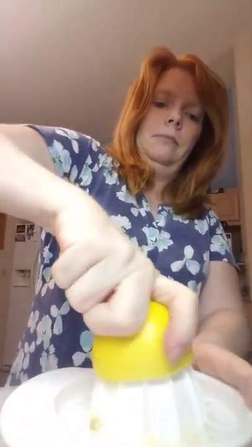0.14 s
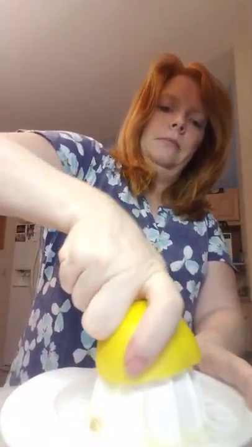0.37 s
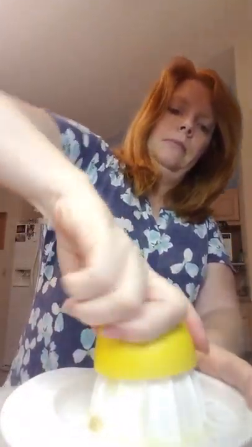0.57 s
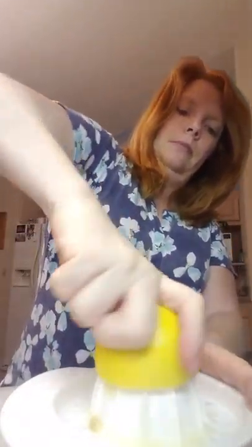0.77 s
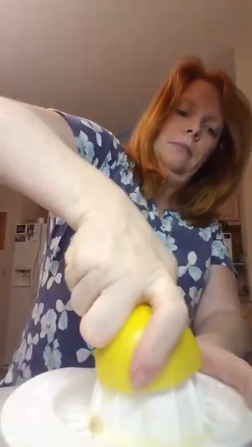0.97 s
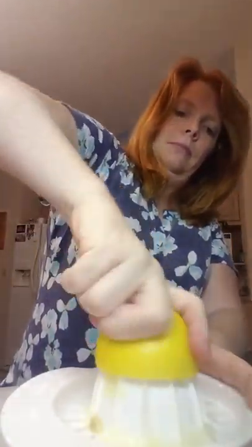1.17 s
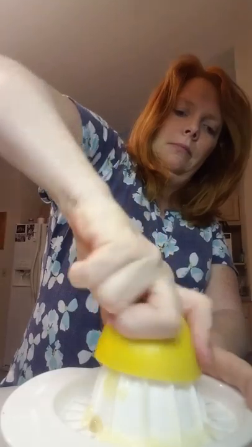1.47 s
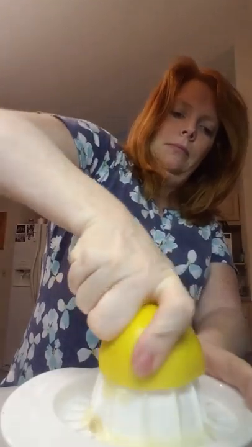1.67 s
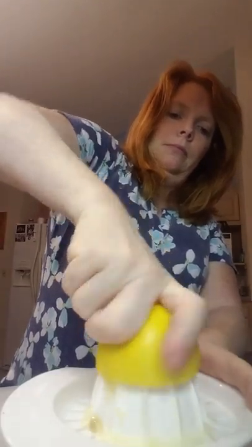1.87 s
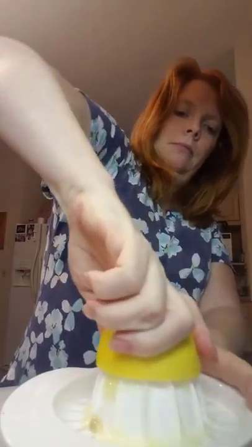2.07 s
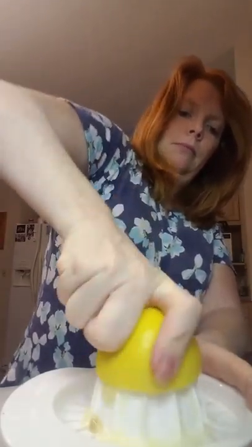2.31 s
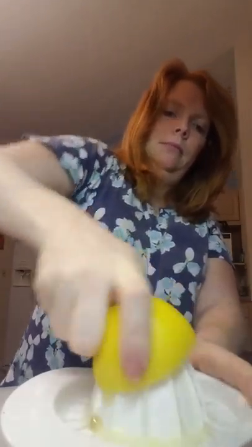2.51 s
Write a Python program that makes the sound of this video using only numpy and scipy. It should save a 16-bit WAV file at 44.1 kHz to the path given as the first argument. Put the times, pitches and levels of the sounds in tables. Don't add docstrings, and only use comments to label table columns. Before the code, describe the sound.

Close phone pickup of hand juicing a lemon: rind jolts over plastic ridges, the bowl thumps the worktop, pulp squishes and pops in uneven bursts, over faint low hum in a small hard room, slightly stronger at right.

```python
import sys
import numpy as np
from scipy import signal
from scipy.fft import rfft, irfft
from scipy.io import wavfile
from scipy.ndimage import uniform_filter1d

SR = 44100
rng = np.random.default_rng(int(sys.argv[2]) if len(sys.argv) > 2 else 0)


def voltage_ratio(level):
    return 10 ** (np.asarray(level, float) / 20)


def materialize(psi):
    bounded = np.clip(np.atleast_2d(psi).T, -1, 1)
    quanta = np.round(bounded * 32767).astype(np.int16)
    wavfile.write(sys.argv[1], SR, quanta)


N = 116865
SPAN = 8192


def unit(x):
    return x / np.sqrt(np.mean(x ** 2))


def gain_at(table, hz):
    points = np.array(table, float)
    return voltage_ratio(np.interp(np.log(hz + 1), np.log(points[:, 0] + 1), points[:, 1]))


def colour(x, table, lag_s=0.):
    hz = np.fft.rfftfreq(N, 1 / SR)
    delay = np.exp(-2j * np.pi * hz * lag_s)
    return irfft(rfft(x) * gain_at(table, hz) * delay, N)


def walk(rate):
    hold = int(SR / rate)
    steps = np.repeat(rng.standard_normal(N // 20), hold)[:N]
    return 2.25 * uniform_filter1d(steps, hold)


def grit(per_s, scatter_db):
    chance, sign, size = rng.random((3, N))
    ticks = (chance < per_s / SR) * np.sign(sign - .5)
    return unit(ticks * voltage_ratio(-scatter_db * np.log(size + 1 / 50)))


def bursts(times, dbs, lengths, rises):
    env, t = np.zeros(N + SPAN), np.arange(SPAN) / SR
    for start, db, length, rise in np.broadcast(times, dbs, lengths, rises):
        i = int(start * SR)
        attack = (1 - np.exp(-t / rise)) ** 2
        env[i:i + SPAN] += voltage_ratio(db) * attack * np.exp(-t / max(length, 2e-4))
    return env[:N]


def tinted(rows, lengths, rises, peak_db, octaves, force, thin_db=0.):
    skirt_db_per_oct, lead = 2, 64
    out, hz = np.zeros((2, N + SPAN)), np.fft.rfftfreq(SPAN, 1 / SR)
    force = np.pad(force, ((0, 0), (0, SPAN)))
    for start, db, centre_hz, length, rise in np.broadcast(*np.array(rows).T[:3], lengths, rises):
        i = int(start * SR) - lead
        env = np.roll(bursts(0, db, length, rise)[:SPAN], lead)
        away = np.abs(np.log2((hz + 1) / centre_hz))
        peak = peak_db * (np.exp(-.5 * (away / octaves) ** 2) - 1)
        skirt = (skirt_db_per_oct + thin_db * (hz < centre_hz)) * away
        out[:, i:i + SPAN] += irfft(rfft(env * force[:, i:i + SPAN]) * voltage_ratio(peak - skirt), SPAN)
    return out[:, :N]


def swings(rows, cycles, glide):
    out, t = np.zeros(N + SPAN), np.arange(SPAN) / SR
    for start, db, hz, turns in np.broadcast(*np.array(rows).T[:3], cycles):
        u, i = t * hz / turns, int(start * SR)
        swell = 4 * u * np.exp(1 - 4 * u)
        phase = 2 * np.pi * turns * u * (1 + glide * np.minimum(u, 2))
        out[i:i + SPAN] += voltage_ratio(db) * swell * np.sin(phase)
    return out[:N]


def ring(x, modes):
    t, h = np.arange(SPAN) / SR, 0
    for hz, db, t60 in modes:
        decay = np.exp(-np.log(1000) * t / t60)
        h = h + voltage_ratio(db) * np.sin(2 * np.pi * hz * t) * decay / np.sqrt(t60)
    return signal.fftconvolve(x, h[None] / np.sqrt(np.sum(h ** 2)), axes=1)[:, :N]


# frequency in Hz, level in dB.
OWN_SHARE = [(60, -23.5), (300, 3), (750, -21), (1200, 4), (3000, -5.5), (6000, -4.5), (10000, 1),
             (15000, -1.5)]


def wide(force):
    return force() + np.array([colour(force(), OWN_SHARE) for _ in range(2)])


# time in seconds, rubbing level in dB, wetness level in dB.
HAND_PRESSURE = [(0, -53.5, -80), (.1, -42, -57.5), (0.329, -40, -41), (0.451, -58, -65),
                 (0.587, -28, -33.5), (0.727, -52.5, -60.5), (0.856, -31.5, -65), (.98, -75, -41),
                 (1.12, -52, -64.5), (1.252, -35.5, -34), (1.45, -58.5, -61.5), (1.54, -40, -48.5),
                 (1.74, -47, -58), (1.888, -75, -61.5), (1.976, -42.5, -40.5), (2.18, -52, -61),
                 (2.289, -54.5, -53.5), (2.46, -53, -55)]


def press(column):
    points = np.array(HAND_PRESSURE)
    return voltage_ratio(np.interp(np.arange(N) / SR, points[:, 0], points[:, column]))


# frequency in Hz, spectral level in dB per Hz.
HUSH = [(18, -46), (30, -31), (131, 14), (616, -7.5), (740, -21.5), (1100, -16), (2980, -23), (14000, -29),
        (16000, -49)]


def kitchen():
    mid, side = (voltage_ratio(-46) * unit(colour(rng.standard_normal(N), HUSH)) for _ in range(2))
    return mid + 0.077 * side * np.array([[1], [-1]])


def bubbles():
    out = 0
    for hz in np.geomspace(1500, 14000, num=9):
        b, a = signal.iirpeak(hz, 4.5, SR)
        out = out + unit(signal.lfilter(b, a, grit(per_s=70, scatter_db=3.6))) * np.sqrt(hz)
    return unit(out)


def crackle():
    films = grit(per_s=4900, scatter_db=3)
    return unit(films + voltage_ratio(0.5) * bubbles() + 0.59 * rng.standard_normal(N))


def wet_rub(wet, flutter):
    return wet * press(2) * voltage_ratio(-0.5 * (flutter + walk(60)))


# start in seconds, peak in dB, colour in Hz, length in seconds.
SQUELCHES = [(.008, -47.5, 2000, 0.019), (0.031, -39.5, 2110, 0.047), (0.069, -47, 3950, 0.018),
             (0.084, -36.5, 2320, 0.02), (0.119, -36, 2770, 0.028), (0.174, -35, 2200, 0.028),
             (0.574, -26, 6260, 0.0083), (0.5944, -16.5, 2980, 0.0074), (0.643, -22, 7700, 0.011),
             (0.756, -31, 7400, 0.048), (0.831, -17.5, 4570, 0.023), (0.989, -28, 2450, 0.014),
             (1.157, -37, 2960, 0.034), (1.214, -23, 2480, 0.02), (1.335, -27.5, 2050, 0.02),
             (1.488, -32.5, 2080, 0.038), (1.539, -39, 3470, 0.11), (1.5674, -14.5, 2640, 0.012),
             (1.576, -15.5, 2800, 0.012), (1.691, -29.5, 3080, 0.047), (1.923, -36.5, 2840, 0.021),
             (1.946, -30.5, 2950, 0.023), (1.973, -21, 4800, 0.008), (2.02, -20.5, 5900, 0.01),
             (2.225, -27, 3080, 0.063), (2.334, -17, 5000, 0.0082), (2.341, -16.5, 12200, 0.011),
             (2.521, -33, 1900, 0.043)]


def squelches(wet):
    length = np.array(SQUELCHES)[:, 3]
    flow = wet * voltage_ratio(0.3 * walk(150))
    return voltage_ratio(-1.5) * tinted(SQUELCHES, length, 0.33 * length, peak_db=-0.5, octaves=0.9, force=flow)


# start in seconds, peak in dB, pitch in Hz.
POCKETS = [(.011, -44, 1850), (.031, -39, 3170), (.0358, -37, 2110), (.044, -37.5, 2020), (.09, -30, 3870),
           (.0937, -27.5, 2270), (.131, -34, 2700), (.1396, -32, 2700), (.1815, -49, 2170),
           (.2783, -36.5, 2360), (.5955, -34, 2750), (.606, -16, 3360), (.9233, -45, 2300),
           (.9951, -37, 2320), (1.2531, -35, 2340), (1.3518, -40, 2120), (1.5005, -35.5, 2200),
           (1.5179, -32, 3420), (1.707, -32, 2900), (1.9335, -41, 2120), (1.9495, -31, 3230),
           (2.26, -27, 2470), (2.266, -30, 5000), (2.315, -33, 3030), (2.5207, -41, 2820)]


def air_pockets():
    return swings(POCKETS, cycles=6.7, glide=0.042)


# start in seconds, peak in dB, thud in
# dB, length in seconds.
JOLTS = [(0.088, -27.5, -25, 0.0065), (0.191, -24, -18, 0.0061), (0.214, -27, 3, 0.0086),
         (0.266, -23, -8, 0.0072), (0.306, -24.5, -25, 0.0076), (0.328, -22, -3, 0.011),
         (0.416, -21.5, 8.5, 0.0051), (0.505, -32.5, 1, 0.0088), (0.543, -32, 6, 0.016),
         (0.57, -28, -19, 0.0032), (0.6, -18.5, 1, 0.0032), (0.659, -21, -2, 0.0047),
         (0.84, -22.5, -15, 0.0088), (0.878, -20.5, -20, 0.0064), (0.923, -30, -12.5, 0.066),
         (0.968, -24, -12, 0.0077), (0.995, -16, -7.5, 0.013), (1.186, -27.5, -14, 0.046),
         (1.212, -29, -6, 0.016), (1.254, -25, -6, 0.036), (1.332, -24, -9, 0.025), (1.501, -24, -9, 0.013),
         (1.573, -11, -5.5, 0.019), (1.705, -31, -9, 0.1), (1.806, -26.5, -28, 0.0069),
         (1.879, -27.5, -29, 0.0085), (1.945, -23, -44, 0.034), (1.973, -31, 5, 0.015),
         (2.018, -18.5, -2, 0.0098), (2.239, -27.5, -10.5, 0.1),
         (1.309, -47, -17, 0.021),
    (.37, -29, 12, 0.0025),
    (1.928, -32.5, -15, 0.024),
    (2.0, -35, -4, 0.015),
    (2.342, -16.5, -11, 0.014),
    (2.389, -45, -20, 0.0022),
    (2.549, -36, 1, 0.034),
]
# frequency in Hz, level in dB, decay time T60 in seconds.
BOWL = [(321, -6.5, 0.044), (458, -8, 0.017), (545.6, 2, 0.034), (730.4, 2.5, 0.059), (762, 0, 0.079),
        (895, -46, 0.012), (1000, -46, 0.017), (673, -6.5, 0.027), (927, -21, 0.13), (1300, -14, 0.019),
        (1695, -10, 0.029), (2110, -14, 0.0097)]
# frequency in Hz, level in dB, decay time T60 in seconds.
WORKTOP = [(85, 1, 0.43), (122.3, -5.5, 0.68), (166.4, -1, 0.14), (192.4, 13.5, 0.051), (273.6, -5, 0.079)]


def rind(flutter):
    start, db, thud_db, length = np.array(JOLTS).T
    jolt_db, rise_s = db - 4.5, 0.0022
    rub = press(1) * voltage_ratio(1.5 * flutter)
    slips = wide(lambda: unit(grit(per_s=700, scatter_db=5.5) + 1.7 * rng.standard_normal(N)))
    strikes = bursts(start, jolt_db + 14, 0.00018, 0.00014)
    bowl_force = slips * (rub + bursts(start, jolt_db, length, rise_s)) - strikes
    thuds = rub * voltage_ratio(-3) + bursts(start, db + thud_db - 1, length, rise_s)
    top_force = wide(lambda: rng.standard_normal(N)) * thuds
    return ring(bowl_force, BOWL) + ring(top_force, WORKTOP)


# start in seconds, peak in dB, pitch in Hz, duration in cycles.
BUMPS = [(0.213, -53, 160, 3.9), (.33, -31, 74.5, 3.3), (.411, -37, 182, 1.5), (0.421, -32, 105, 2),
         (0.58, -19, 182, 4), (0.594, -42, 85.5, 1), (.622, -26, 155.5, 5.7), (0.659, -34, 146, 6.1),
         (0.738, -41.5, 120, 5.1), (0.849, -30, 152, 4.4), (0.994, -32, 190, 3.9), (1.202, -20.5, 199, 5.7),
         (1.232, -33, 170, 4.1), (1.27, -24.5, 90, 2.6), (1.304, -28.5, 162, 3.2), (1.347, -24, 169, 3.7),
         (1.38, -35.5, 162.5, 6.9), (1.574, -14.5, 114, 1.5), (1.574, -19, 460, 3.5),
         (1.586, -38, 203, 1.3), (1.604, -23, 138, 3.2), (1.632, -27.5, 120, 2.1), (1.66, -33, 110, 2.2),
         (1.725, -45, 171, 2), (1.969, -31, 147, 3.2), (2.019, -32.5, 85, 2.8), (2.344, -20, 96, 2.4),
         (2.344, -27, 374, 5.6), (2.345, -25.5, 1020, 8), (2.4, -38, 79, 2.7)]


def bowl_bumps():
    return swings(BUMPS, np.array(BUMPS)[:, 3], glide=-0.082)


# start in seconds, peak in dB, colour in Hz.
POPS = [(0.4479, -40, 12100), (0.4635, -43, 7500), (0.4738, -41, 7500), (.5043, -37, 4300),
        (0.5182, -32, 3300), (0.5307, -27, 3030), (0.5451, -26, 4840), (0.594, -15, 3500),
        (0.644, -16.5, 7650), (0.6605, -24, 2700), (0.7002, -36, 7190), (0.8295, -21.5, 5750),
        (0.8606, -14.5, 2900), (1.1862, -18.5, 13000), (1.2206, -13.5, 13800), (1.3085, -20, 5400),
        (1.6732, -26, 13600), (1.8562, -27.5, 5700), (2.0163, -4, 6100), (2.0168, -11, 12500),
        (2.25, -20, 3400), (2.277, -17.5, 4860), (2.3418, -3, 11100), (2.5502, -22.5, 2650)]


def cell_pops():
    length_s = 0.0017
    noise = wide(lambda: np.sign(rng.standard_normal(N)))
    return voltage_ratio(6) * tinted(POPS, length_s, length_s / 10, peak_db=10, octaves=0.19, force=noise, thin_db=3.5)


# start in seconds, level in dB, pitch in Hz.
JET = [
    (2.019, -19, 5800),
]


def juice_jet(wet):
    length_s = .024
    return tinted(JET, length_s, length_s / 10, peak_db=45, octaves=.09, force=wet)


# frequency in Hz, level in dB.
PULP = [(500, 16), (1200, -3.5), (2800, 5), (4000, 3), (6500, 4), (9000, 0.5), (12000, -6), (16000, -16.5)]


def pulp(flutter):
    wet = wide(crackle)
    flow = wet_rub(wet, flutter) + squelches(wet) + cell_pops() + juice_jet(wet)
    return colour(flow, PULP) + air_pockets()


def echoes(x, t60, db):
    t = np.arange(2 * SPAN) / SR
    h = rng.standard_normal((2, 2 * SPAN)) * np.exp(-np.log(1000) * t / t60) * (t > .001)
    h = signal.lfilter([1, -.9], [1, -.7], h)
    h = h / np.sqrt(np.mean(np.sum(h ** 2, axis=1)))
    return voltage_ratio(db) * signal.fftconvolve(x, h, axes=1)[:, :N]


# frequency in Hz, level in dB.
LEFT_PORT = [(60, -4), (150, -5), (300, -10), (700, -6.5), (2400, -4.5), (5500, -7), (9500, -5),
             (14000, -2.5)]


def scene():
    flutter = walk(24.22)
    juicer = pulp(flutter) + rind(flutter) + bowl_bumps()
    near = echoes(juicer, t60=0.0082, db=-3.5)
    room = echoes(juicer, t60=0.55, db=-24.5)
    air = juicer + near + room + kitchen()
    return np.array([colour(air[0], LEFT_PORT, lag_s=5.4e-5), air[1]])


def top_cut(x):
    return signal.sosfilt(signal.butter(12, 16970, fs=SR, output="sos"), x)


# frequency in Hz, level in dB.
MIC = [(20, -58), (45, -8), (80, -3.5), (8000, -3), (8800, -14.5), (10800, -5), (15500, 8), (16200, -22)]


def record(dry):
    heard = colour(dry, MIC)
    return top_cut(heard)


dry = scene()
out = record(dry)
materialize(out)
```